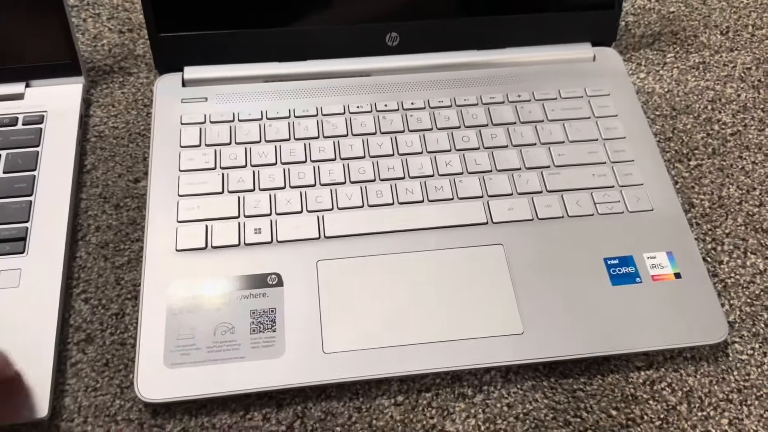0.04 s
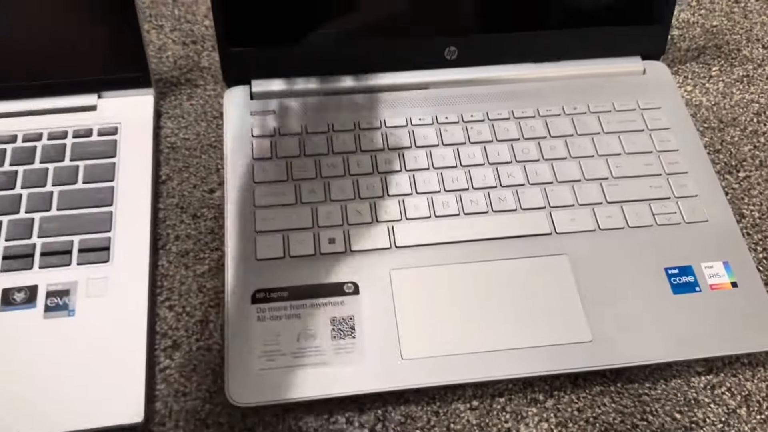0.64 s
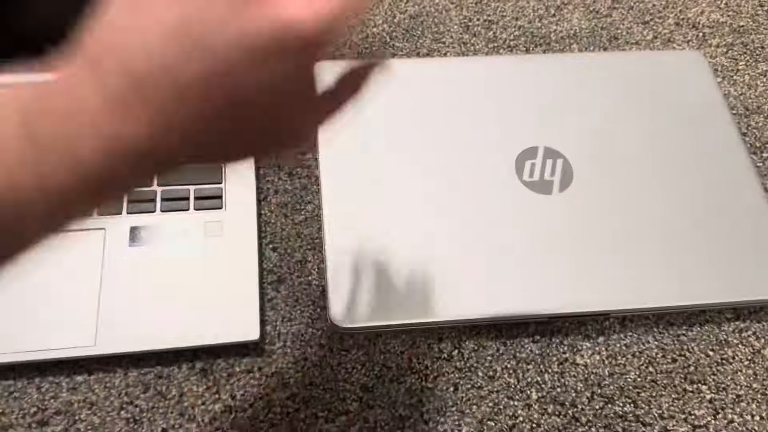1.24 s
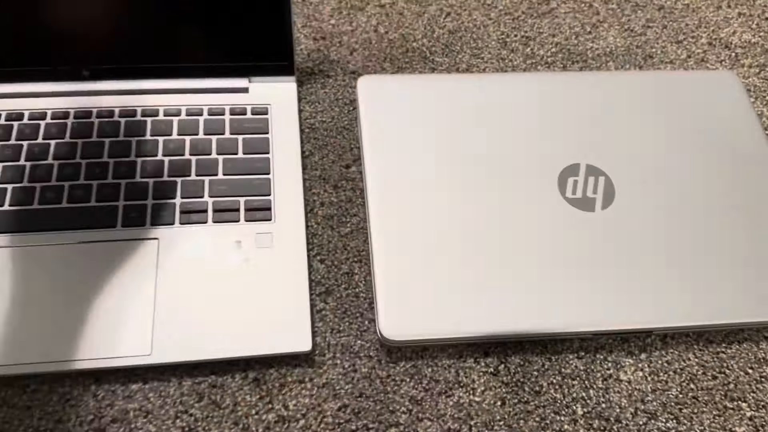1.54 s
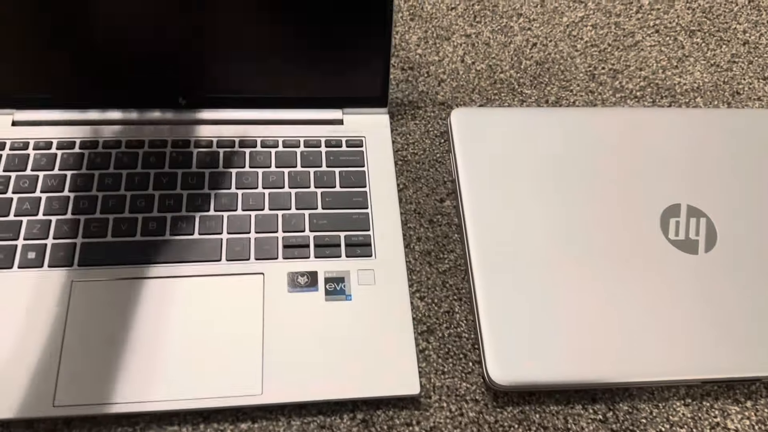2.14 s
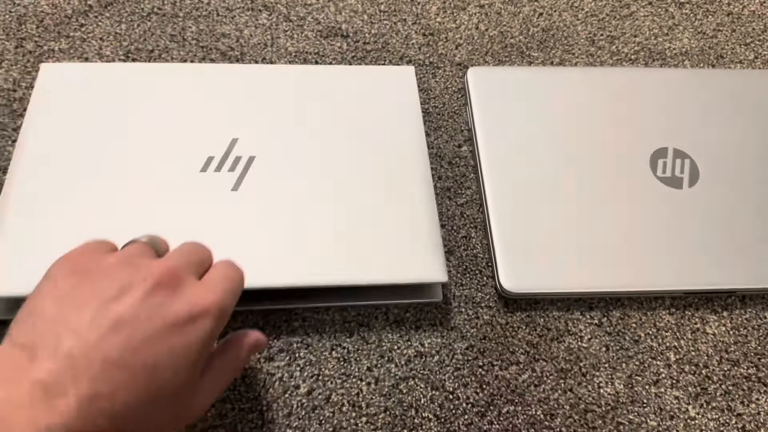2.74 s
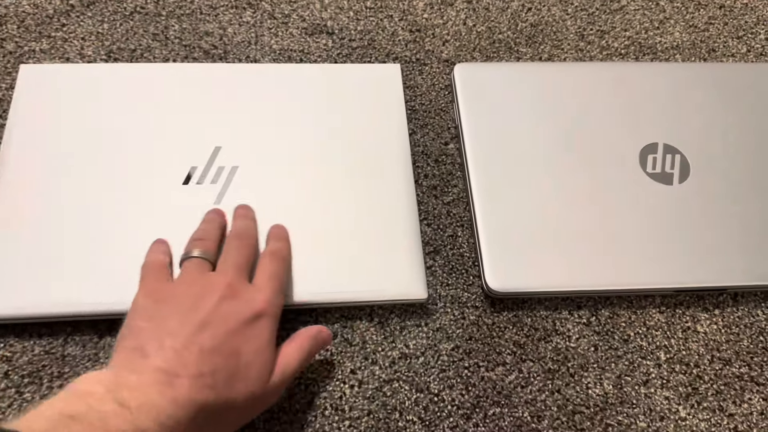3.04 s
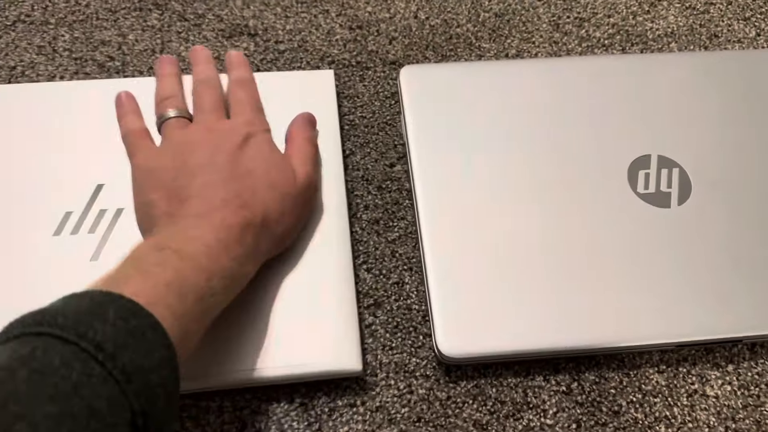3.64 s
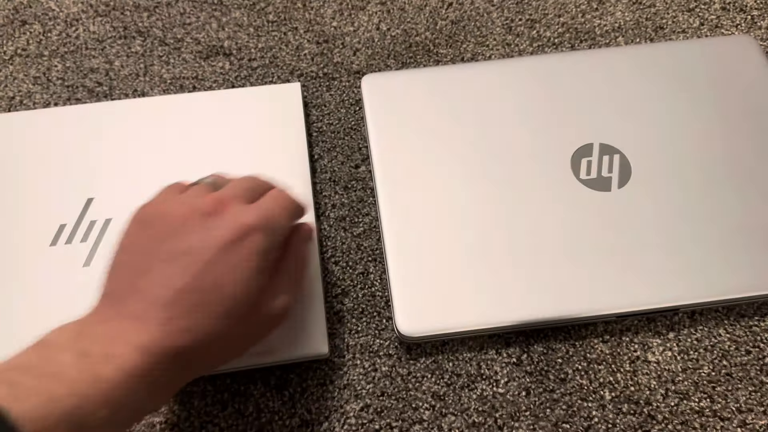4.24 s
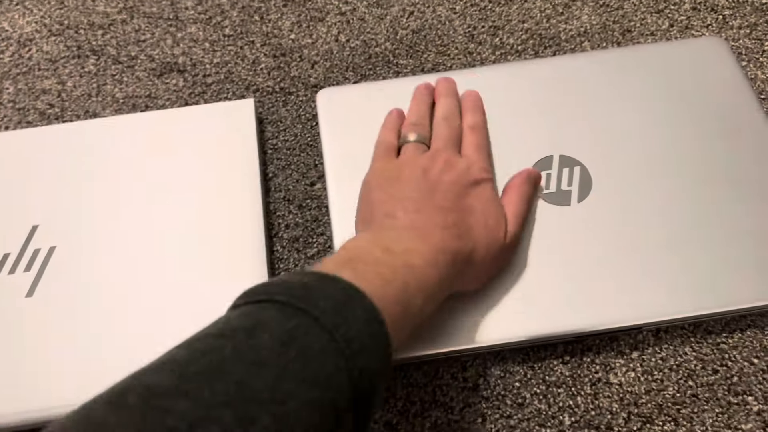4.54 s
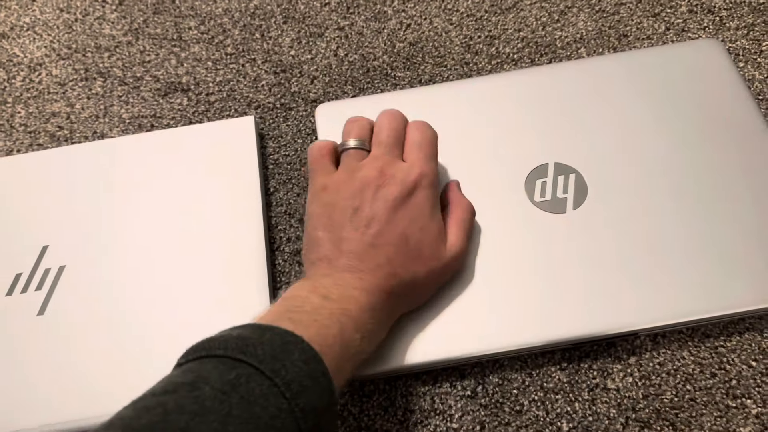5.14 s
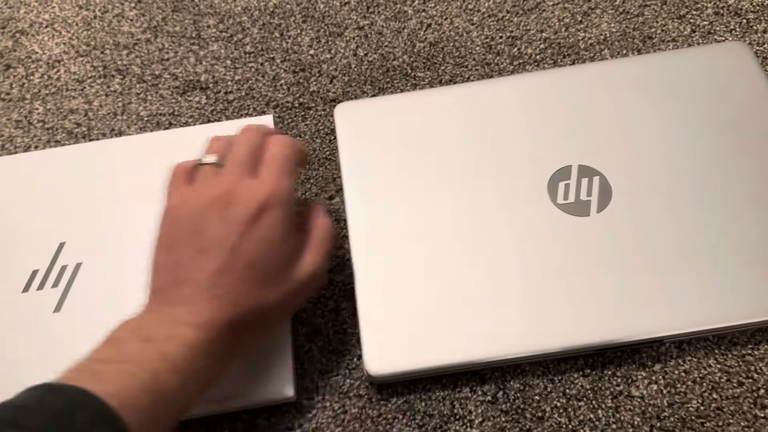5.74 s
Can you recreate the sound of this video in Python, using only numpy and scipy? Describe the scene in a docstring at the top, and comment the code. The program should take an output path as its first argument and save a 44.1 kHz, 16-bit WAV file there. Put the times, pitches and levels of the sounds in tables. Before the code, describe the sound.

Two laptops are closed on a carpeted floor, heard up close in a small room with a faint, steady rumble and electrical hum. After light brushes of a hand, a plastic lid creaks and ticks from about 0.7 to 1 second, with soft low thuds. At 1.2 seconds it slams shut with a sharp knock and a slight key rattle, the loudest sound. A soft bump follows at 1.5 seconds. Light touches come around 2.5 seconds, and the metal laptop closes more gently at 2.8 seconds with a small rebound. From 3 to 4.2 seconds a palm slides over the metal lid, a dry hiss that swells and fades. At 4.4 seconds the hand pats the plastic lid dully and sweeps it more quietly. From 5.1 seconds the fingertips stick and slip in short judders, with a brief falling squeak near 5.6 seconds and a last light brush.

```python
"""Two laptops shut and stroked

Two laptops lie on carpet in a small room with a low rumble and a mains hum. A hand grips each lid and
shuts it: the plastic one creaks and slams, the metal one closes more gently. Panels ring, keys rattle
and the chassis thud on the floor. The palm hisses over the metal lid, then pats and sweeps the plastic
one, where the fingertips stick and slip at the edge with a judder and a brief squeak."""
import sys
import numpy as np
from scipy import signal
from scipy.fft import rfft, irfft, next_fast_len
from scipy.io import wavfile
from scipy.ndimage import uniform_filter1d

SR = 44100
rng = np.random.default_rng(int(sys.argv[2]) if len(sys.argv) > 2 else 0)


def store_pcm(level_fs):
    """Save levels as 16-bit WAV."""
    pcm = np.round(np.clip(level_fs, -1, 1) * 32767).astype(np.int16)
    wavfile.write(sys.argv[1], SR, np.atleast_2d(pcm).T)


N = 259572

# lid bezel modes: f/Hz, width/Hz, level/dB
BEZEL_MODES = [(1100, 300, -8), (1430, 200, 1), (1950, 190, -2), (2470, 250, -1), (3400, 120, -14),
               (3690, 120, -12), (4580, 100, -19), (5050, 220, -12), (5780, 300, -16), (8330, 140, -20),
               (9330, 96, -18)]
# chassis modes, rung through the hinge: f/Hz, width/Hz, level/dB
CHASSIS_MODES = [(215, 60, 0), (320, 80, 0), (470, 80, 0), (600, 70, -1), (800, 180, -5), (1150, 300, -6)]
# spectrum of skin rubbing on plastic: f/Hz, level/dB
PLASTIC_RUB = [(300, -34), (550, -10), (1000, -7.5), (1600, -3), (2300, -3.5), (3000, -2.5), (4200, -4),
               (5600, -2), (7000, -3), (8500, -.5), (11000, 0), (14500, 0)]
# fingertip drags: start/s, end/s, rise/s, judder/dB, hiss/dB
DRAGS = [(5.072, 5.2, .05, -51, -67), (5.21, 5.29, .025, -59, -74.5), (5.297, 5.38, .008, -53.5, -68.5),
         (5.385, 5.465, .035, -56.5, -66), (5.471, 5.645, .008, -51, -57.5)]
# left-right coherence of the room: f/Hz, coherence
ROOM_COHERENCE = [(60, 0.82), (180, 0.8), (550, 0.47), (1650, 0.03), (4970, 0.12), (15000, -0.04)]


def amp(db):
    """Decibels to gain."""
    return 10 ** (np.asarray(db) / 20)


def unit(x):
    """Scale to rms 1."""
    return x / np.sqrt(np.mean(x ** 2) + 1e-20)


def along(points, hz):
    """Read (f/Hz, value) points on a log axis."""
    f, v = np.transpose(points)
    return np.interp(np.log(hz + 1), np.log(f + 1), v)


def wobble(rate_hz, size):
    """Random curve of rms about 1, linear between knots."""
    knots = rng.standard_normal(int(size * rate_hz / SR) + 4)
    return np.interp(np.arange(size) * rate_hz / SR, np.arange(len(knots)), knots) * np.sqrt(3 / 2)


def spiky_noise(depth_db, rate_hz, size):
    """White noise with a flickering level."""
    return rng.standard_normal(size) * amp(depth_db * wobble(rate_hz, size))


def decay(t, t60_s, rise_s):
    """Exponential attack and decay."""
    return amp(-60 * t / t60_s) * (1 - np.exp(-t / rise_s))


def swell(t, start_s, end_s, power):
    """Rounded rise and fall; more power, softer edges."""
    u = np.clip((t - start_s) / (end_s - start_s), 0, 1)
    return (4 * u * (1 - u)) ** power


def add(out, x, at_s):
    """Mix x into out from at_s on."""
    part = out[..., round(at_s * SR):][..., :x.shape[-1]]
    part += x[..., :part.shape[-1]]


def filtered(x, response):
    """Apply a complex frequency response."""
    size = next_fast_len(x.shape[-1] + 4096, True)
    return irfft(rfft(x, size) * response(np.fft.rfftfreq(size, 1 / SR)), size)[..., :x.shape[-1]]


def impulse(response, size=16384):
    """Impulse response, faded to silence."""
    return irfft(response(np.fft.rfftfreq(size, 1 / SR))) * np.cos(np.pi / 2 * np.arange(size) / size)


def resonances(modes, f):
    """Causal response of (f/Hz, width/Hz, level/dB) modes of alternating sign."""
    return sum((-1) ** k * amp(db) * 1j * f * width / (hz * hz - f * f + 1j * f * width)
               for k, (hz, width, db) in enumerate(modes))


def bending(f, lag_s):
    """Bending waves carry treble faster than bass; lag_s is the delay at 1 kHz."""
    return np.exp(-4j * np.pi * lag_s * np.sqrt(1000 * f))


def noise(spectrum, coherence, size):
    """Coloured stereo noise with a mid signal of rms 1."""
    width = lambda f: np.tan(np.arccos(np.clip(along(coherence, f), -.8, 1)) / 2)
    white = rng.standard_normal((2, size))
    mid, side = filtered(white, lambda f: amp(along(spectrum, f)) * [np.ones(len(f)), width(f)])
    return np.array([mid + side, mid - side]) / np.std(mid)


def placed(x, lean, lead=None, lead_scale=1):
    """The laptops' midrange reaches the right microphone louder, the left one earlier."""
    # left minus right at lean 1: f/Hz, level/dB
    balance = [(200, .5), (400, 1), (750, -4), (1300, -6), (2400, -5), (4400, -4), (8000, 0), (15000, 0)]
    # default lead of the left side: f/Hz, phase/rad
    laptop_lead = [(200, 0), (500, .4), (1100, .7), (2200, 1.1), (4400, .3), (8000, 0)]
    sides = np.array([[.5], [-.5]])
    gain = lambda f: amp(lean * along(balance, f) * sides)
    phase = lambda f: lead_scale * along(lead or laptop_lead, f) * sides
    return filtered(x, lambda f: gain(f) * np.exp(1j * phase(f)))


def room(x, wet_db, delay_s=.007):
    """Diffuse reverberation, coherent in the bass, each band dying at its own rate."""
    # reverberation time: f/Hz, t60/s
    room_t60 = [(100, .36), (400, .3), (1200, .29), (5000, .36), (14000, .23)]
    hz, t, bands = signal.stft(noise([(100, 0), (10000, 0)], ROOM_COHERENCE, 16384), SR, nperseg=256)
    tail = signal.istft(bands * amp(-60 * t / along(room_t60, hz)[:, None]), SR, nperseg=256)[1]
    tail = np.pad(tail / np.linalg.norm(tail.mean(axis=0)), ((0, 0), (round(delay_s * SR), 0)))
    return amp(wet_db) * signal.fftconvolve(x[None], tail, axes=1)[:, :len(x)]


def background(rumble_db=-58, air_db=-73.5):
    """Steady rumble and air noise of the house, with a slightly unsteady mains hum."""
    # rumble spectrum: f/Hz, level/dB
    rumble_spectrum = [(15, -59), (25, -29), (46, -7), (75, .5), (130, -7), (150, -11), (175, -19),
                       (216, -17), (321, -29), (365, -21), (400, -25), (520, -55), (880, -120)]
    # air noise spectrum: f/Hz, level/dB
    air_spectrum = [(140, -30), (220, 1), (300, -6), (360, -1), (492, -6), (581, -9.5), (907, -8),
                    (1110, -18), (1440, -13), (2320, -24), (3180, -22), (5660, -23), (10800, -38),
                    (14000, -39), (15500, -48)]
    # hum tones: f/Hz, level/dB
    hum_tones = [(63, -71), (120.5, -66)]
    t = np.arange(N) / SR
    hum = sum(np.sqrt(2) * amp(db + 2.5 * wobble(5, N)) * np.sin(2 * np.pi * hz * t + .5 * wobble(4, N))
              for hz, db in hum_tones)
    rumble = amp(rumble_db) * noise(rumble_spectrum, ROOM_COHERENCE, N)
    air = amp(air_db) * noise(air_spectrum, ROOM_COHERENCE, N)
    return rumble + air + hum


def shell(x, ripple_db=2.3, spacing_hz=70, travel_hz=6, patchy_db=1.3):
    """Close lid modes ripple the rubbing; the colour shifts with hand position and skin contact."""
    ripples = rng.standard_normal((2, 2048))
    here, there = [filtered(x, lambda f: amp(ripple_db * np.interp(f / spacing_hz, np.arange(2048), r)))
                   for r in ripples]
    position = (1 + np.tanh(2 * wobble(travel_hz, x.shape[-1]))) / 2
    bands = signal.stft(position * here + (1 - position) * there, nperseg=256)[2]
    patches = uniform_filter1d(rng.standard_normal(bands.shape[1:]), size=6, axis=0)
    patches = uniform_filter1d(patches, size=36, axis=1)
    return signal.istft(bands * amp(patchy_db * unit(patches)), nperseg=256)[1][:, :x.shape[-1]]


def rub(spectrum, panel, hiss, fine, grain_db, lead_scale, split_hz=3000, fine_hz=11500):
    """Skin slides on a matt lid: tiny slips hiss, and below them the panel sounds."""
    # left-right coherence of rubbing: f/Hz, coherence
    coherence = [(60, 0.92), (380, 0.65), (700, 0.55), (1500, 0.75), (3000, 0.7), (6500, 0.3)]
    # lead of the left side: f/Hz, phase/rad
    hand_lead = [(400, 0), (1600, .6), (2800, 3.1), (4000, 5.4), (5500, 6.1), (7000, 8)]
    size = len(hiss)
    slips = noise(spectrum, coherence, size)
    low, below_fine = [filtered(slips, lambda f: 1 / (1 + (f / hz) ** 12)) for hz in (split_hz, fine_hz)]
    sound = panel * unit(low) + hiss * unit(below_fine - low) + fine * unit(slips - below_fine)
    grain = amp(grain_db * wobble(500, size) + .6 * wobble(22, size))
    return placed(shell(sound * grain), lean=.9, lead=hand_lead, lead_scale=lead_scale)


def brush(start_s, end_s, db, spectrum, panel_db, fine_db):
    """A short rub that swells and fades."""
    out, t = np.zeros((2, N)), np.arange(max(start_s, 0), end_s, 1 / SR)
    hiss = amp(db) * swell(t, start_s, end_s, power=1.9)
    sound = rub(spectrum, amp(panel_db) * hiss, hiss, amp(fine_db) * hiss, grain_db=1.3, lead_scale=.3)
    add(out, sound, t[0])
    return out


def brushes(slide_s=.02):
    """Light touches, the hiss around each fingertip drag, and the turning hinge's faint rub."""
    # the hand reaches, grips, lets go: start/s, end/s, hiss/dB, fine hiss re hiss/dB
    touch_strokes = [(-.08, .15, -67, -14), (.36, 1.04, -70.5, -14), (.99, 1.13, -81, 0),
                     (2.425, 2.585, -65, -.5), (2.6, 2.93, -71, -12.5), (2.83, 3.03, -66, -14),
                     (5.835, 5.92, -62, -10)]
    # spectrum of a light touch: f/Hz, level/dB
    touch_spectrum = [(300, -40), (700, -8), (1800, -5), (2800, -1), (5000, -1), (7500, -3), (10000, -9),
                      (12500, -12), (15000, -10)]
    touches = sum(brush(start_s, end_s, db, touch_spectrum, panel_db=-7, fine_db=fine_db)
                  for start_s, end_s, db, fine_db in touch_strokes)
    slides = sum(brush(start_s - slide_s, end_s + slide_s, db, PLASTIC_RUB, panel_db=-8, fine_db=-4)
                 for start_s, end_s, _, _, db in DRAGS)
    hinge_rub = brush(start_s=.9, end_s=1.19, db=-85, spectrum=PLASTIC_RUB, panel_db=6, fine_db=-15)
    return touches + slides + hinge_rub


def creaks(ring_db=.5, snap_db=8, scatter_db=1.2):
    """A gripped lid slips in short uneven runs that ring its bezel and the chassis."""
    # creaks and ticks: t/s, level/dB, relative treble/dB, t60/s, cut-off/Hz, relative chassis/dB
    ticks = [(.654, -49, -28, .17, 3500, -16), (.6725, -49, -26, .008, 3500, -12),
             (.724, -56, -20, .12, 5000, -8), (.739, -53, -12, .04, 7000, -10),
             (.7585, -48, -9, .014, 6000, -2), (.768, -41, -23, .02, 2000, -7),
             (.783, -44, -20, .05, 3500, -2), (.791, -43, -18, .03, 4000, -4),
             (.822, -34, -18, .012, 9000, -16), (.892, -48, -16, .014, 8000, -14),
             (.938, -53, -9, .015, 8000, -14), (.956, -50, -13, .01, 9000, -14),
             (2.647, -56, -23, .008, 6000, -14), (4.329, -63, -3, .005, 9000, -20)]
    out, t = np.zeros((2, N)), np.arange(SR // 4) / SR
    peak_at = lambda x, db: amp(db) * x / abs(x).max()
    for at_s, db, treble_db, t60_s, cutoff_hz, chassis_db in ticks:
        # each slip has its own spot on the bezel
        modes = [(hz, width, level + scatter_db * rng.standard_normal())
                 for hz, width, level in BEZEL_MODES]
        burst = spiky_noise(depth_db=5, rate_hz=1500, size=len(t)) * decay(t, t60_s, rise_s=.002)
        ring = filtered(burst, lambda f: resonances(modes, f) / (1 + 1j * f / cutoff_hz) ** 2)
        snap = filtered(burst, lambda f: resonances([(5200, 5500, 0)], f) ** 2)
        body = filtered(burst, lambda f: resonances(CHASSIS_MODES, f))
        creak = peak_at(ring, ring_db) + peak_at(snap, treble_db + snap_db) + peak_at(body, chassis_db)
        add(out, amp(db) * (placed(creak, lean=.7) + room(creak, wet_db=-18)), at_s)
    return out


def thuds():
    """A soft contact, then the laptop's weight bounces on the carpeted floor with a low ring."""
    # soft blows: t/s, contact/dB, cut-off/Hz, bounce delay/s, bounce/dB, f/Hz, t60/s
    blows = [(.659, 2.5, 210, .004, -41, 88, .12), (.954, -3, 200, .001, -44, 85, .12),
             (1.5295, 1.5, 620, .026, -37.5, 104, .2), (2.362, -9, 250, .002, -48, 75, .1),
             (2.488, -6, 330, .004, -49, 110, .1), (2.935, 7.5, 230, .012, -42, 145, .12),
             (4.419, 3, 260, .011, -36, 132, .09)]
    # floorboard modes: f/Hz, width/Hz, level/dB
    floor_modes = [(103, 40, -4), (170, 80, -1), (330, 130, -1), (650, 300, -6), (1500, 800, -21)]
    out, t = np.zeros((2, N)), np.arange(SR // 2) / SR
    floor = impulse(lambda f: resonances(floor_modes, f) * bending(f, lag_s=.0008))
    for at_s, contact_db, cutoff_hz, delay_s, bounce_db, hz, t60_s in blows:
        contact = amp(contact_db) * signal.lfilter(*signal.butter(2, cutoff_hz, fs=SR), floor)
        bounce = amp(bounce_db) * decay(t, t60_s, rise_s=.004) * np.sin(2 * np.pi * hz * t)
        add(out, contact + room(contact, wet_db=-13), at_s)
        add(out, bounce, at_s + delay_s)
    return out


def hinge(start_s=.72, end_s=.89, db=-68, chassis_db=1):
    """The stiff hinge grinds in tiny slips as it starts to turn."""
    out, t = np.zeros((2, N)), np.arange(start_s, end_s, 1 / SR)
    slips = spiky_noise(depth_db=5, rate_hz=400, size=len(t))
    body = lambda f: resonances(BEZEL_MODES, f) + amp(chassis_db) * resonances(CHASSIS_MODES, f)
    grind = amp(db) * unit(filtered(slips, body)) * swell(t, start_s, end_s, power=1.2)
    add(out, placed(grind, lean=.7), start_s)
    return out


def slam(blows, modes, lag_s, crack_t60_s, crack_rise_s, tilt_db, rattle_db, rattle_t60_s, lean, wet_db):
    """A lid meets its base: the edge chatters, the panels carry a falling chirp, the keys rattle."""
    # spectrum of the hard edge contact: f/Hz, level/dB
    edge_spectrum = [(800, -20), (1800, -1), (3000, -4), (4800, -4), (6300, 0), (9000, -2), (13000, -10),
                     (15500, -9)]
    out = np.zeros((2, N))
    panels = impulse(lambda f: resonances(modes, f) * bending(f, lag_s))
    edge_db = lambda f: along(edge_spectrum, f) + tilt_db * np.log2(1 + f / 4000)
    edge = impulse(lambda f: amp(edge_db(f)) * bending(f, lag_s))
    t = np.arange(len(panels)) / SR
    for at_s, db, crack_db, cutoff_hz in blows:
        knock = amp(db) * signal.lfilter(*signal.butter(1, cutoff_hz, fs=SR), panels)
        chatter = rng.standard_normal((2, len(t))) * decay(t, crack_t60_s, crack_rise_s)
        chatter /= np.linalg.norm(chatter.mean(axis=0))
        crack = signal.fftconvolve(edge[None], chatter, axes=1)[:, :len(t)]
        direct = knock + amp(crack_db) * crack + amp(crack_db + rattle_db) * rattle(t, rattle_t60_s)
        add(out, placed(direct, lean) + room(knock + amp(crack_db + 2.5) * edge, wet_db), at_s)
    return out


def rattle(t, t60_s, spiky_db=3.5):
    """Keys jump, tick against their frames and settle."""
    # key modes: f/Hz, width/Hz, level/dB
    key_modes = [(1450, 350, -5), (2650, 600, -4), (3500, 600, -4), (4550, 600, -5), (5600, 600, -6),
                 (7100, 700, -8)]
    ticks = rng.standard_normal((2, len(t))) * amp(spiky_db * wobble(700, len(t)))
    return unit(filtered(ticks, lambda f: resonances(key_modes, f))) * decay(t, t60_s, rise_s=.012)


def lids():
    """The plastic lid shuts hard, the metal one more gently; rebounds are duller."""
    # panel modes: f/Hz, width/Hz, level/dB
    plastic_modes = [(62, 22, 0), (122, 40, 1), (175, 80, -1.5), (280, 110, -.5), (350, 60, 2.5),
                     (410, 70, -5.5), (690, 150, -14), (845, 70, -10), (922, 24, -7), (1020, 170, -13),
                     (1320, 200, -9.5), (1590, 130, -16), (2020, 190, -23.5), (2650, 300, -32)]
    metal_modes = [(62, 25, -4), (130, 70, -3), (180, 40, -4), (278, 95, .5), (385, 90, -8.5),
                   (650, 130, -4.5), (820, 110, -7.5), (970, 160, -10), (1210, 150, -9), (1470, 150, -16),
                   (1990, 210, -9), (2760, 400, -18.5), (3550, 400, -25), (4500, 350, -28),
                   (5500, 300, -31)]
    # closing blow and rebounds: t/s, knock/dB, crack/dB, knock cut-off/Hz
    plastic_blows = [(1.1903, 27.6, -2.8, 7000), (1.2025, 4, -22, 1200), (1.212, 2, -19, 900),
                     (1.2165, 12, -23, 600), (1.2325, 10, -27, 450)]
    metal_blows = [(2.8388, 16, -14, 6000), (2.9272, -4.5, -30, 3000), (2.934, -7.5, -33, 2500),
                   (2.9465, -8, -29, 2000)]
    plastic = slam(plastic_blows, plastic_modes, lag_s=.0001, crack_t60_s=.016, crack_rise_s=.0003,
                   tilt_db=-2, rattle_db=-45, rattle_t60_s=.35, lean=1.1, wet_db=-15.3)
    metal = slam(metal_blows, metal_modes, lag_s=.0017, crack_t60_s=.02, crack_rise_s=.0015,
                 tilt_db=-7, rattle_db=-39, rattle_t60_s=.28, lean=.6, wet_db=-12)
    return plastic + metal


def sweep(stroke, spectrum, hollow, panel_db, hiss_db, fine_db, lifts_db, grain_db, lead_scale):
    """One long rubbing stroke of the cupped palm."""
    out = np.zeros((2, N))
    times_s, *levels_db = np.transpose(stroke)
    t = np.arange(times_s[0], times_s[-1], 1 / SR)
    hiss, panel, fine = [amp(np.interp(t, times_s, db)) for db in levels_db]
    sound = rub(spectrum, amp(panel_db) * panel, amp(hiss_db) * hiss, amp(fine_db) * fine,
                grain_db, lead_scale)
    add(out, cupped(sound, t[0], hollow, lifts_db), t[0])
    return out


def cupped(x, start_s, hollow, lifts_db, width_oct=.2):
    """The hollow under the palm lifts two bands, which move as the hand changes shape."""
    hz, t, bands = signal.stft(x, SR, nperseg=512)
    times_s, *centres_hz = np.transpose(hollow)
    away_oct = [np.log2((hz[:, None] + 1) / np.interp(start_s + t, times_s, c)) for c in centres_hz]
    lift_db = sum(db * np.exp(-(away / width_oct) ** 2) for db, away in zip(lifts_db, away_oct))
    return signal.istft(bands * amp(lift_db), SR, nperseg=512)[1][:, :x.shape[-1]]


def hand():
    """The palm sweeps the metal lid, then the plastic one, with light brushes before and after."""
    # palm strokes: t/s, hiss/dB, panel/dB, fine hiss/dB
    metal_stroke = [(2.97, -69, -71, -76), (3.03, -59, -70, -59), (3.178, -60, -68, -61),
                    (3.306, -59, -69, -58), (3.45, -52, -58, -50), (3.608, -53, -57, -58),
                    (3.64, -47, -54, -54), (3.738, -48, -54, -50), (3.846, -47, -55, -49),
                    (3.878, -47, -55, -51), (4.022, -50, -57, -53), (4.098, -59, -69, -57),
                    (4.154, -63, -69, -66), (4.18, -69, -78, -75), (4.206, -70, -74, -77),
                    (4.26, -97, -89, -102)]
    plastic_stroke = [(4.41, -69, -64, -77), (4.42, -66, -60, -66), (4.444, -65, -76, -62),
                      (4.584, -61, -66, -60), (4.68, -68, -65, -74), (4.724, -60, -63, -62),
                      (4.77, -57, -65, -59), (4.864, -63, -72, -62), (4.994, -64, -76, -65),
                      (5.054, -75, -78, -84), (5.08, -70, -73, -81)]
    # resonances under the palm: t/s, lower f/Hz, upper f/Hz
    metal_hollow = [(3.05, 1500, 5600), (3.4, 1700, 5500), (3.6, 1750, 4700), (3.78, 1850, 4700),
                    (3.92, 2050, 4700), (4.01, 2250, 3600), (4.2, 2300, 3600)]
    plastic_hollow = [(4.45, 2900, 6000), (4.62, 2300, 5800), (4.72, 2200, 5600), (4.77, 2900, 4300),
                      (4.83, 1500, 5700), (5.05, 1450, 5700)]
    # spectrum of skin rubbing on metal: f/Hz, level/dB
    metal_rub = [(300, -34), (550, -16), (800, -10), (1150, -8.5), (1800, -2), (2600, -1.5), (3500, -1),
                 (4700, -1.5), (6500, -2.5), (7500, -3.5), (8700, -2), (11000, -4), (14500, -3)]
    metal = sweep(metal_stroke, metal_rub, metal_hollow, panel_db=.5, hiss_db=0, fine_db=4,
                  lifts_db=(4, 3), grain_db=.9, lead_scale=1)
    plastic = sweep(plastic_stroke, PLASTIC_RUB, plastic_hollow, panel_db=0, hiss_db=1.8, fine_db=4,
                    lifts_db=(4, 2.5), grain_db=.8, lead_scale=.5)
    skin = metal + plastic + brushes()
    return skin + room(skin[0], wet_db=-17)


def pats():
    """Soft skin meets the plastic lid patch by patch: a short dull slap."""
    # fingers, then palm: t/s, level/dB, t60/s
    contacts = [(4.411, -48.5, .045), (4.4175, -41, .06)]
    # slap resonances: f/Hz, width/Hz, level/dB
    slap_modes = [(339, 50, 9), (662, 80, -6), (1150, 250, -2), (1800, 350, -6), (2900, 700, -11),
                  (3900, 400, -17)]
    out, t = np.zeros((2, N)), np.arange(SR // 8) / SR
    for at_s, db, t60_s in contacts:
        patches = spiky_noise(depth_db=3, rate_hz=900, size=len(t))
        slap = unit(filtered(patches, lambda f: resonances(slap_modes, f)))
        slap *= amp(db) * decay(t, t60_s, rise_s=.0012)
        add(out, placed(slap, lean=.5) + room(slap, wet_db=-14), at_s)
    return out


def press(t, start_s, end_s, rise_s, release_s=.045, easing_db_per_s=12):
    """The pressure of one drag builds, eases off and lets go."""
    gate = np.clip((t - start_s) / rise_s, 0, 1) * np.clip((end_s - t) / release_s, 0, 1)
    return gate * amp(-easing_db_per_s * (t - start_s))


def fingertips(slip_hz=480, scatter=.6, roughness=.45, uneven_db=1.8, duck_db=-4.5,
               squeak_s=(5.54, 5.612), squeak_hz=(1055, 980), squeak_db=-53, waver=.014):
    """Fingertips stick and slip on the lid's edge; the judder gives way to a brief falling squeak."""
    # lid edge modes: f/Hz, width/Hz, level/dB
    edge_modes = [(355, 130, -4), (640, 120, -6), (830, 90, 0), (1020, 110, -4), (1200, 160, -10),
                  (1420, 130, -1), (1580, 140, -1), (2220, 190, -14), (2810, 250, -15)]
    out, t = np.zeros((2, N)), np.arange(5 * SR, N) / SR
    cycles = np.floor(np.cumsum(slip_hz * np.exp(scatter * wobble(300, len(t)))) / SR)
    slips = unit(np.diff(cycles, prepend=0) * amp(uneven_db * wobble(400, len(t))))
    slips += roughness * rng.standard_normal(len(t))
    pressure = sum(amp(db) * press(t, start_s, end_s, rise_s) for start_s, end_s, rise_s, db, _ in DRAGS)
    judder = unit(filtered(slips, lambda f: resonances(edge_modes, f))) * pressure
    squeaking = swell(t, *squeak_s, power=.25)
    pitch_hz = np.interp(t, squeak_s, squeak_hz) * (1 + waver * wobble(250, len(t)))
    squeak = amp(squeak_db) * squeaking * np.sin(2 * np.pi * np.cumsum(pitch_hz) / SR)
    sound = judder * amp(duck_db * squeaking) + squeak
    add(out, placed(sound, lean=.8) + room(sound, wet_db=-16), t[0])
    return out


def scene():
    """All sources, left and right."""
    return lids() + thuds() + creaks() + hinge() + pats() + hand() + fingertips() + background()


def record(dry, low_cut_hz=52, shared_hz=7900, top_hz=15780):
    """Band-limited stereo; above shared_hz the left microphone feeds both sides with a turning phase."""
    # lead of the left side in the treble: f/Hz, phase/rad
    treble_lead = [(8800, 0), (10600, -3.1), (11800, -3.2), (13700, -2 * np.pi)]
    shared = lambda f: 1 / (1 + (shared_hz / (f + 1)) ** 40)
    turn = lambda f: np.exp(1j * along(treble_lead, f) * np.array([[.5], [-.5]]))
    both = filtered(dry, lambda f: 1 - shared(f)) + filtered(dry[0], lambda f: shared(f) * turn(f))
    low_cut = lambda f: signal.freqs(*signal.butter(2, low_cut_hz, "high", analog=True), f)[1]
    return filtered(both, lambda f: low_cut(f) / (1 + (f / top_hz) ** 240))


dry = scene()
out = record(dry)
store_pcm(out)
```